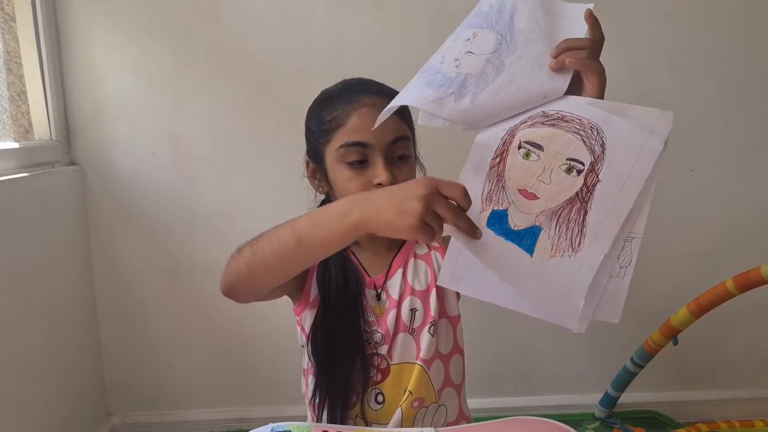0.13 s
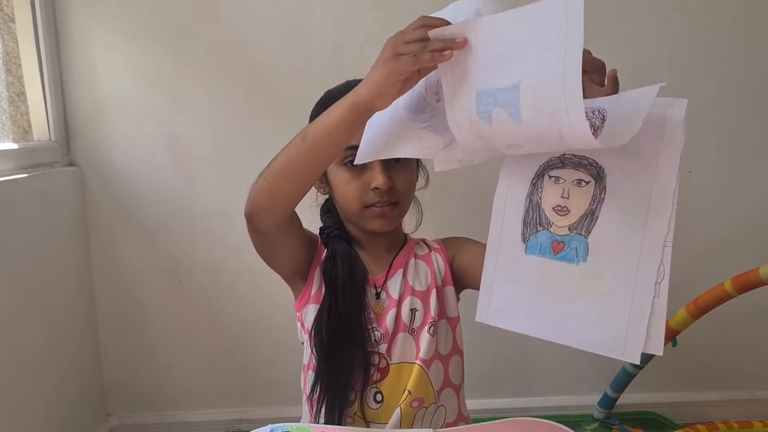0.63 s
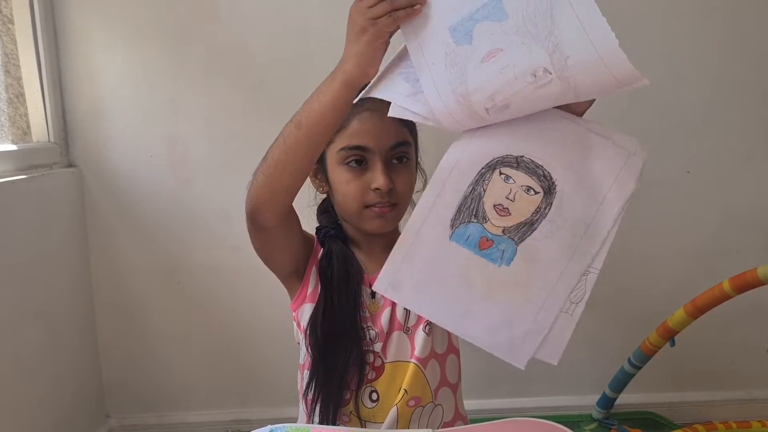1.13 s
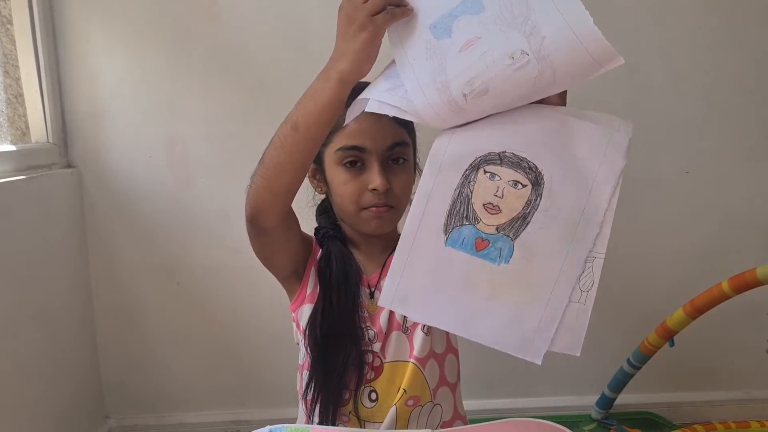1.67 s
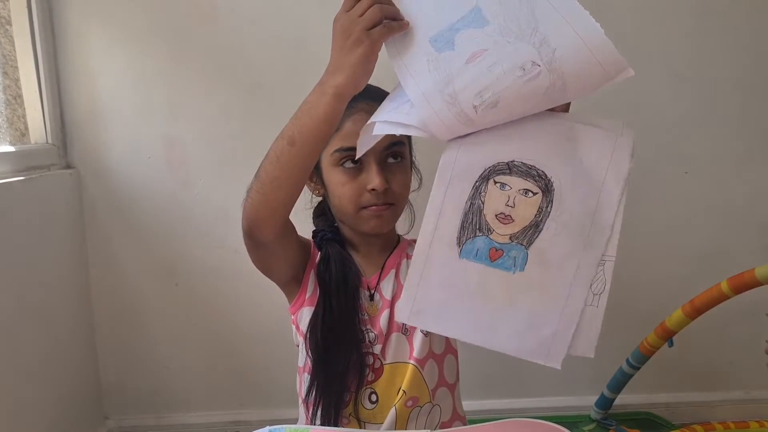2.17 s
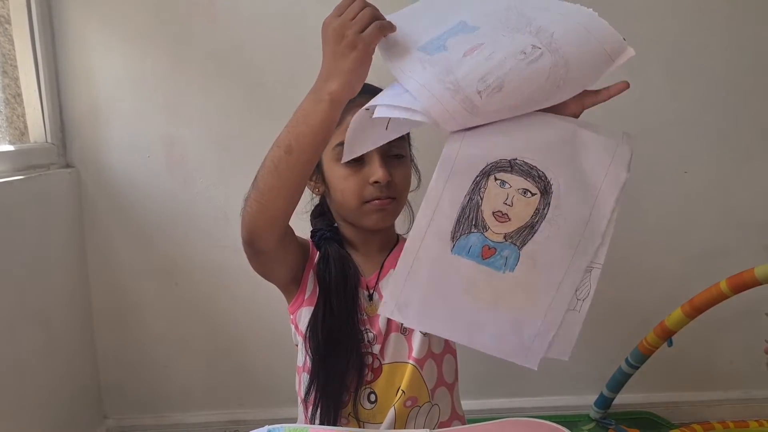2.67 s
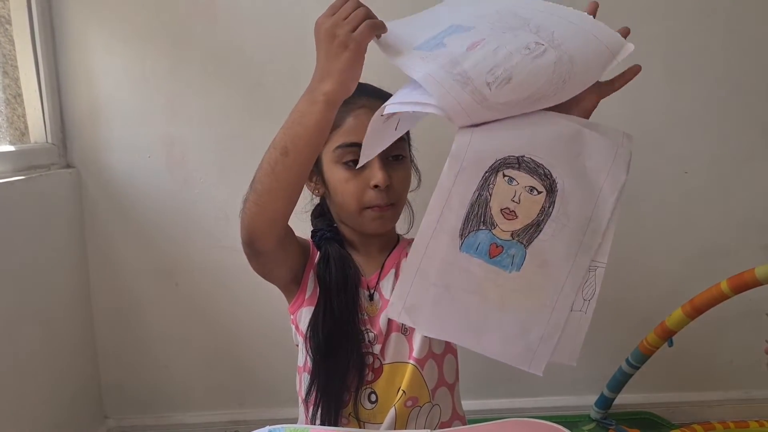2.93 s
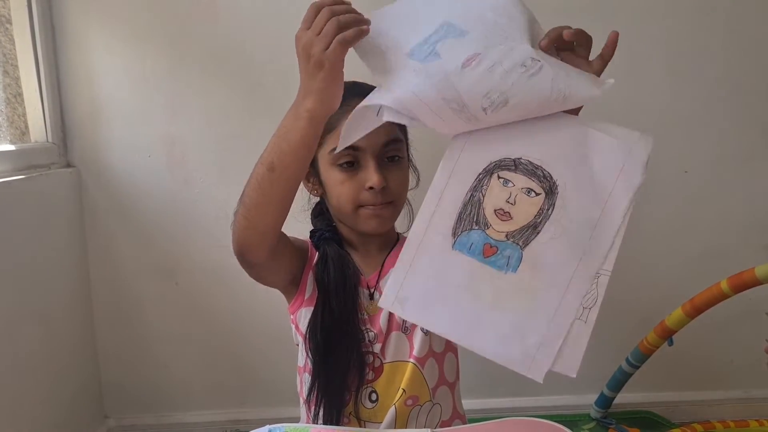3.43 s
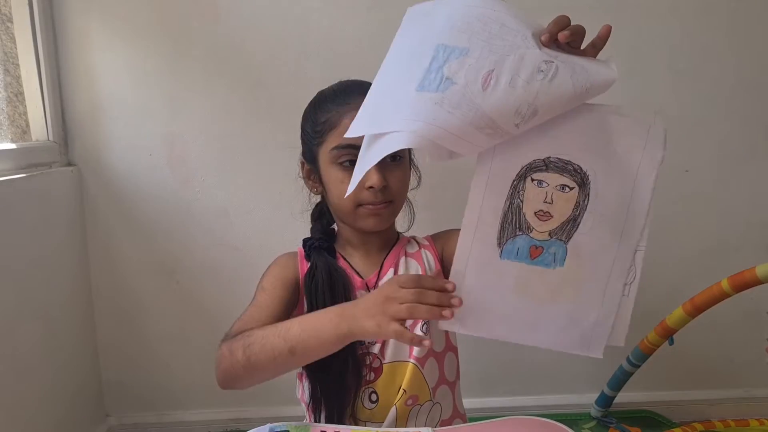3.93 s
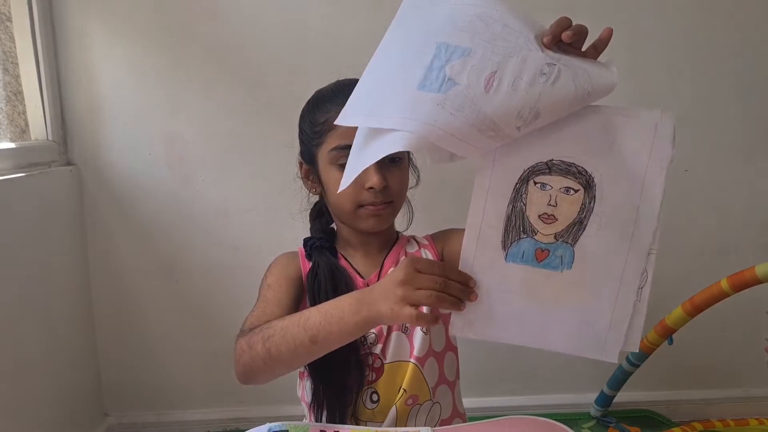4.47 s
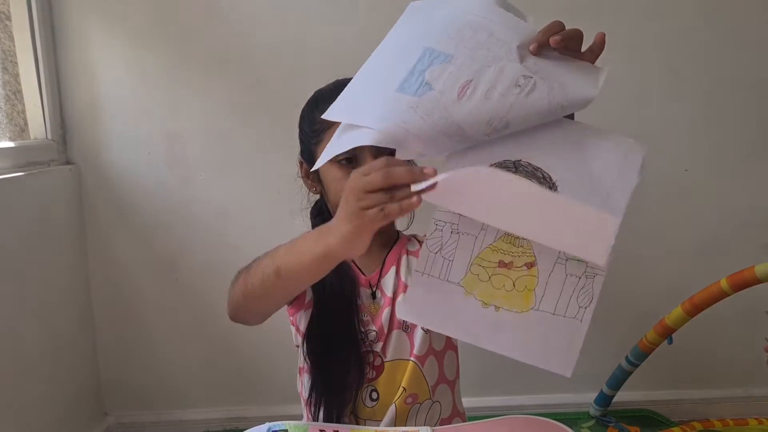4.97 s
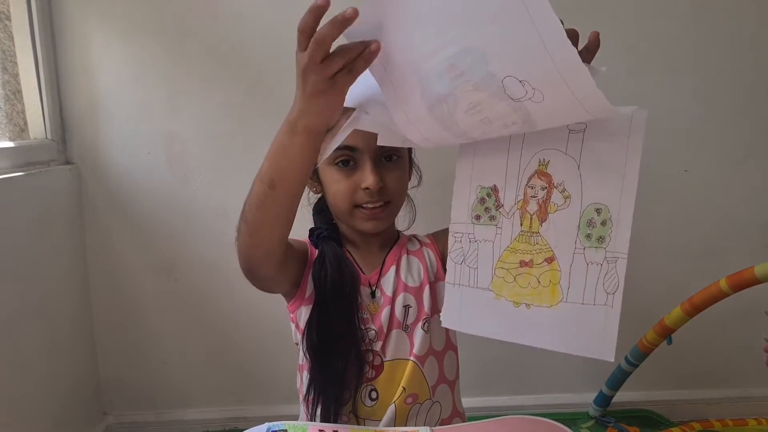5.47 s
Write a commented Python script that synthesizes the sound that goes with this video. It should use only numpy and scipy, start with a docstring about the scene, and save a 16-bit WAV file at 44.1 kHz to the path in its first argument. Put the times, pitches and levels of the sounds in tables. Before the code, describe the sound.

Loose sheets of paper are handled and turned close to the microphone in a small bare room. Faint air noise and a low, wavering hum continue throughout. From the start to about 0.45 seconds, rustling swells quickly into a cluster of crisp snaps and crackles, with low taut pops. A bright, clicky pop comes at 0.75 and a strong crack at 1.06. Then only faint sliding remains until a clear snap at 2.0 and a smaller one at 2.3. Rustling and buckling return from about 2.5 to 3.5, strongest near 3.0 and 3.28. It is almost still until 4.6, with tiny ticks. Another flip begins around 4.77, rustles strongly near 5.15, gives a sharp, high pop at 5.29 and ends with brisk crackles around 5.55. Snaps carry short, decaying room echoes; treble is much louder on the right.

```python
"""Room tone and a low wavering hum run from the first moment to the last: filtered noise, under everything.
Over them sheets of paper are lifted and flipped in a small bare room. They buckle with sharp snaps, each
a crack and a dying volley of creases, and the walls answer with decaying echoes. Between and under the
snaps the sheets slide over each other in swells of fine random crackle; from a quarter second on, some taut
patches pop with a pitch, as short dying sines. The right microphone port hears the treble far louder."""
import sys
import numpy as np
from scipy import signal
from scipy.fft import rfft, irfft, next_fast_len
from scipy.io import wavfile

SR = 44100
rng = np.random.default_rng(int(sys.argv[2]) if len(sys.argv) > 2 else 0)


def wav_out(sig):
    """Save sig, one row per channel (or a flat mono array), as 16-bit PCM at SR to the path in sys.argv[1]."""
    wavfile.write(sys.argv[1], SR, np.round(np.clip(np.atleast_2d(sig).T, -1, 1) * 32767).astype(np.int16))


def rack_gain(trim_db):
    """Turn a fader trim in dB into the linear factor to multiply a signal by."""
    fader = np.asarray(trim_db, float)
    return 10 ** (fader / 20)


N = 246959
HZ = np.fft.rfftfreq(next_fast_len(N + SR), 1 / SR) + 1e-3  # frequency grid, kept off zero for the log axis

# Colour of the room's air noise. Each row: frequency in Hz, relative density in dB per Hz.
ROOM_TONE_COLOUR = [(20, 3.5), (50, 10.5), (100, 10.5), (190, -3), (400, 5), (1300, -10), (2200, -92),
                    (3300, -11.5), (4000, -18.5), (6300, -14), (7800, -56), (10000, -43), (12000, -15),
                    (16000, -21)]
# Swelling and sinking of the hum. Each row: time in seconds, level ahead of the ports in dB.
HUM_SWELLS = [(0.0, -66), (0.25, -77), (0.36, -61), (0.92, -74), (1.12, -67), (2.21, -78), (2.28, -64.5),
              (3.1, -75), (3.38, -64.5), (3.51, -74), (3.9, -68), (4.18, -86), (4.44, -58.5), (4.6, -76),
              (4.66, -64), (5.6, -71)]
# The right port resonates. Each row: frequency in Hz, left minus right at full share in dB.
PORT_TILT = [(700, -0.5), (1400, -3.5), (2200, -8.5), (2700, -6.5), (3300, -16), (4000, -17), (6800, -25.5),
             (7600, -3), (8000, -17), (9200, -6), (12000, -33), (15000, -14)]
# How alike the two ports hear the sound. Each row: frequency in Hz, left-right likeness from 0 to 1.
PORT_LIKENESS = [(60, 0.95), (250, 0.81), (500, 0.85), (1000, 0.38), (2000, 0.06), (5000, 0.073)]
# Buckling snaps of the sheets. Each row: start in seconds, strength of the crackle in dB, then, in dB against
# that strength, sharpness of the crease, breadth of the panel, flap of the whole sheet.
SNAPS = [(0.0034, -36, -18, 2, -22), (0.1119, -30.5, -16, -11, -17), (0.1363, -28, -38, -9.5, -20.5),
         (0.2282, -33, -16, -22, -29), (0.2495, -23, -26, -10, -22), (0.2941, -26.5, -7.5, -3, -22),
         (0.303, -22.5, -9.5, -10, -21), (0.3199, -27, -38, -14, -28), (0.377, -28.5, -0.5, -9.5, -11.5),
         (0.3859, -26.5, -19, -12, -24), (0.5188, -41, -26, -10, -12), (0.6937, -38.5, -32, -13, -33),
         (0.7452, -25.5, -15.5, -13.5, -20.5), (0.819, -49, -22, -6, -3), (0.8546, -49.5, -30, 2.5, -12),
         (0.9665, -51, -36, -1, -21), (1.057, -18, -11.5, -5, -24), (1.2026, -44.5, -34, -2, -19),
         (1.7, -53.5, -3.5, 6, -27), (1.7519, -38, -19, -8, -32), (2.0121, -21.5, -21.5, -7.5, -26),
         (2.207, -67, -6, 12, -3), (2.2952, -36, -39, -9.5, -27), (2.5224, -36, -28, -1, -22.5),
         (2.5518, -40.5, -23.5, -17, -16.5), (2.9743, -32.5, -10.5, -8, -27),
         (3.0043, -32, -37, -8.5, -20.5), (3.1219, -39.5, -12, 3.5, -5), (3.257, -42, -7.5, 1, -32),
         (3.2843, -23, -9, -6.5, -24), (3.465, -34.5, -25, -9, -17), (3.9868, -51, -18.5, -31, -13),
         (4.4126, -49.5, -29, -12, -5), (4.607, -46.5, -27, -1.5, -10.5), (4.7664, -35, -19, -7, -7.5),
         (4.78, -30, -23.5, -10, -17), (4.8722, -47, -19, -5.5, -11), (5.0402, -43.5, -5, -18, -13.5),
         (5.2893, -25, -9, -17, -22), (5.375, -49, -26, -4, -6), (5.4189, -39.5, -30, -16, -11.5),
         (5.5082, -48, -14, -13, -17), (5.5513, -31.5, -22.5, -6.5, -45), (5.5924, -30, -22, -7, -24)]
# Colour of paper at the microphone. Each row: frequency in Hz, relative density in dB per Hz.
PAPER_COLOUR = [(80, -14.5), (200, -28), (500, -26.5), (1000, -6.5), (1600, 2.5), (2300, 1.5), (3300, 1),
                (5000, 1.5), (6700, -1.5), (7700, -11.5), (8800, -10), (12000, -3), (15500, -12),
                (16500, -53)]
# Borders in Hz between the flap, panel, crackle, crisp and edge ranges, from low to high.
RANGE_BORDERS_HZ = 900, 2600, 4600, 7500
# Decay of the echoes. Each row: frequency in Hz, time to fall by 60 dB in seconds.
ROOM_T60 = [(300, 0.19), (790, 0.098), (2090, 0.23), (5510, 0.33), (14600, 0.16)]
# Low standing waves that a flap excites. Each row: frequency in Hz, width in Hz, gain at the centre in dB.
ROOM_MODES = [(140, 25, 19), (260, 25, 8), (515, 45, 9)]
# Strokes of the hand that slide sheet over sheet. Each row: start in seconds, length in seconds,
# pressure as crackle level in dB, then, in dB against it, speed as sharpness, breadth in contact.
STROKES = [(0.014, 0.12, -56.5, -5.5, -4.5), (0.102, 0.074, -46, -16, -5), (0.199, .1, -43, -16.5, -3),
           (0.3, 0.061, -42.5, -29, -10), (0.403, 0.11, -54, -5, -7), (0.566, 0.094, -55, -5.5, -14.5),
           (0.637, 0.14, -52.5, 1, -8), (0.784, 0.17, -63, -2.5, 4.5), (0.837, 0.22, -59, -11.5, -9.5),
           (1.234, 0.14, -60.5, -8.5, -10), (1.356, .11, -61, -4.5, -8), (1.494, 0.25, -64, -7, -4),
           (1.69, .1, -60, -13, -12), (1.8, 0.39, -72, -6, -0.5), (2.172, 0.16, -64, -6, -18),
           (2.274, .14, -62, 3.5, -9), (2.391, 0.15, -58.5, -5, -21), (2.58, 0.18, -75, -3.5, -9),
           (2.693, 0.19, -66.5, -7, -12.5), (2.83, 0.51, -61.5, -3, -9), (2.98, 0.048, -45, -16, -5),
           (3.115, 0.1, -53.5, -2.5, 3.5), (3.213, 0.066, -49, -33, -14), (3.354, 0.17, -55.5, -11, -13),
           (3.477, 0.25, -69.5, -7.5, -3.5), (3.7, 0.034, -54, -10, -3), (4.287, 0.33, -79, -11, -4),
           (4.445, 0.13, -72, -3, -12), (4.497, 0.023, -59.5, -6, -14), (4.64, 0.029, -56.5, -7.5, -3.5),
           (4.664, 0.094, -57, -12.5, -1), (4.795, 0.14, -62.5, -6.5, -3.5),
           (4.949, 0.097, -61, -2.5, -6.5), (5.02, 0.26, -62, 2, -5.5), (5.127, .11, -45.5, -11, -3),
           (5.21, 0.22, -60.5, 4.5, 0), (5.38, 0.095, -56, -31, -1.5), (5.485, 0.16, -57.5, -9, -6)]
# Taut patches facing the microphone. Each row: start in seconds, strength ahead of the ports in dB,
# pitch in Hz, time to fall by 60 dB in seconds.
POPS = [(0.27, -40.5, 503, 0.093), (0.379, -41, 530, 0.073), (0.403, -44, 532, 0.074),
        (0.747, -21.5, 2880, .025), (0.75, -23, 4600, 0.016), (1.059, -32.5, 1052, .04),
        (1.202, -50, 1364, 0.13), (2.012, -49, 857, 0.044), (3.465, -33, 1490, 0.009),
        (3.987, -41.5, 4070, .015), (4.332, -57.5, 307, 0.11), (4.413, -50.5, 1600, 0.074),
        (4.7665, -45.5, 469, 0.12), (5.2904, -16, 3820, .01), (5.415, -46, 2050, .05),
        (5.551, -32, 2980, .01)]

ROOM_TONE_DB, HUM_HZ, HUM_WIDTH_HZ = -69.5, 67, 11
RIGHT_LAG_MS, TONE_PORT_SHARE = 0.095, 0.25  # the room tone takes only part of the port tilt
SPOTS = 4  # places where the sheets sound, each with its own echoes
CRACK_DB, CRUMPLE_S = 21.5, 0.0036  # first crack over the faintest creases; fading time of the volley
SETTLE_DB, SETTLE_S = -35, 0.083  # after a snap the sheet keeps creasing faintly
# Sharpness lifts the edge range in full and the crisp range in part; breadth lifts the panel range.
SNAP_FLAP_DB, SNAP_PANEL_DB, SNAP_EDGE_DB = 4, 2, 4
SNAP_CRISP_DB, SNAP_CRISP_SHARE = 6.5, 0.5
SLIDE_CRISP_DB, SLIDE_CRISP_SHARE = 4.5, 0.61
# The flap of a stroke follows pressure only in part, and breadth a little.
SLIDE_FLAP_DB, SLIDE_FLAP_SHARE, SLIDE_FLAP_FOLLOWS = -69.5, 0.19, 0.76
MEAN_PRESSURE_DB = -62
SWELL_POWER = 0.67  # a stroke swells and fades as a half sine to this power
GRIP_DB, GRIP_SHARP_DB, GRIP_BROAD_DB = -79, -9.5, -1  # the held sheets never rest quite still


def rms_one(x):
    """Scale to rms 1."""
    return x / np.sqrt(np.mean(x ** 2) + 1e-20)


def at_hz(points, hz=HZ):
    """Read a table of frequency and value on a log frequency axis."""
    table = np.array(points)
    return np.interp(np.log(hz), np.log(table[:, 0]), table[:, 1])


def shaped(x, gain):
    """Multiply the spectrum by a gain given on HZ."""
    size = 2 * len(HZ) - 2
    return irfft(rfft(x, size) * gain, size)[..., :N]


def drift(rate_hz):
    """Slow random wandering of rms 1: noise through two equal low-pass poles."""
    r = np.exp(-2 * np.pi * rate_hz / SR)
    slow = signal.lfilter([1], [1, -2 * r, r * r], rng.standard_normal(N + SR))
    return rms_one(slow[SR:])  # the first second is run-in


def pair(sources, port_share):
    """Two unrelated signals become left and right: alike in the bass, own gain per port, the right a little late."""
    alike = np.clip(at_hz(PORT_LIKENESS), 0, 1)
    mid, side = np.sqrt(1 + alike), np.sqrt(1 - alike)
    tilt = rack_gain(port_share * at_hz(PORT_TILT) / 2)
    norm = np.sqrt(tilt ** 2 + tilt ** -2)
    lag = np.exp(-2j * np.pi * HZ * RIGHT_LAG_MS / 1000)
    left, right = tilt / norm, lag / tilt / norm
    return np.array([shaped(sources[0], mid * left) + shaped(sources[1], side * left),
                     shaped(sources[0], mid * right) - shaped(sources[1], side * right)])


def room_tone():
    """Steady air noise, and a hum of narrow-band noise that wavers and follows its swells."""
    air = rms_one(shaped(rng.standard_normal((2, N)), rack_gain(at_hz(ROOM_TONE_COLOUR))))
    resonance = 1 / (1 + (2 * (HZ - HUM_HZ) / HUM_WIDTH_HZ) ** 2)
    hum = rms_one(shaped(rng.standard_normal((2, N)), resonance))
    hum_db = np.interp(np.arange(N) / SR, *np.transpose(HUM_SWELLS))
    return pair(rack_gain(ROOM_TONE_DB) * air + rack_gain(hum_db) * hum, TONE_PORT_SHARE)


def crackle(size, per_s, spread_db):
    """Tiny creases give way at random, a few much louder than the rest."""
    chance, rarity, side = rng.random((3, size))
    loudness = rack_gain(-spread_db * np.log(rarity + 0.012))
    return (chance < per_s / SR) * loudness * np.sign(side - 0.5)


def five_ranges(x):
    """Crackle, flap, panel, crisp and edge ranges, adjoining in frequency, each at rms 1."""
    a, b, c, d = RANGE_BORDERS_HZ
    cuts = [([b, c], "band"), ([a / 5, a], "band"), ([a, b], "band"), ([c, d], "band"), (d, "high")]
    filters = [signal.butter(2, hz, kind, fs=SR, output="sos") for hz, kind in cuts]
    return [rms_one(signal.sosfiltfilt(sos, x)) for sos in filters]


def snaps(paper, span_db=-18.5):
    """A panel pops through with one crack, then a dying volley of creases while the sheet settles."""
    span, lead = 4096, len(paper) // 2  # lead: delay of the centred paper filter
    out = np.zeros((SPOTS, N + SR))
    t = np.arange(span) / SR
    dying = np.exp(-t / CRUMPLE_S) + rack_gain(SETTLE_DB) * np.exp(-t / SETTLE_S)
    for k, (start_s, strength_db, sharp_db, broad_db, flap_db) in enumerate(SNAPS):
        volley = crackle(span, 12000, 4.4) * dying
        volley[0] = rack_gain(CRACK_DB)
        colour_db = np.array([0, SNAP_FLAP_DB + flap_db, SNAP_PANEL_DB + broad_db,
                              SNAP_CRISP_DB + SNAP_CRISP_SHARE * sharp_db, SNAP_EDGE_DB + sharp_db])
        ranges = five_ranges(np.convolve(volley, paper)[:span])
        at = round(start_s * SR)
        # span_db brings strength down to the mean level over the span
        out[k % SPOTS, at:at + span] += rack_gain(strength_db + span_db + colour_db) @ ranges
    return out[:, lead:lead + N]


def room(x, direct_db=-10.0, left_favour=0.08, early_db=7.0, early_s=0.00067,
         first_echo_s=0.00023, build_s=0.00055):
    """Direct sound, then echoes that thicken and die band by band: one part alike in both ports, one differing."""
    t = np.arange(SR // 2) / SR
    edges_hz = 75 * 2. ** np.arange(9)  # octaves
    white, tail = rng.standard_normal((2, 2, len(t))), 0
    for k, (low, high) in enumerate(zip(edges_hz, edges_hz[1:])):
        octave = signal.butter(2, [low, high], "band", fs=SR, output="sos")
        band = signal.sosfilt(octave, white[k % 2])
        t60 = at_hz(ROOM_T60, np.sqrt(low * high))
        tail = tail + band * rack_gain(-60 * t / t60) / np.sqrt(t60)
    tail = tail * (1 - np.exp(-np.maximum(t - first_echo_s, 0) / build_s))
    tail = tail * (1 + rack_gain(early_db) * np.exp(-t / early_s))  # near walls answer loudest
    tail /= np.sqrt(np.sum(tail ** 2) / 2)
    tail[:, 0] = rack_gain(direct_db) * np.array([1, left_favour])  # the left port faces the paper
    return signal.fftconvolve(x[None], tail, axes=1)[:, :N]


def standing_waves(x):
    """Low modes of the room ring along as narrow resonances."""
    return sum(rack_gain(db) * signal.lfilter(*signal.iirpeak(hz, hz / width, SR), x) for hz, width, db in ROOM_MODES)


def rub_gains(press_db, sharp_db, broad_db):
    """Pressure, speed and breadth of a rub set the gain of each of the five ranges."""
    flap_db = (SLIDE_FLAP_DB + SLIDE_FLAP_FOLLOWS * (press_db - MEAN_PRESSURE_DB)
               + SLIDE_FLAP_SHARE * broad_db)
    crisp_db = press_db + SLIDE_CRISP_DB + SLIDE_CRISP_SHARE * sharp_db
    return rack_gain([press_db, flap_db, press_db + broad_db, crisp_db, press_db + sharp_db])[:, None]


def sliding(paper, clump_db=3.0, wander_hz=6.0):
    """Dense creasing in clumps swells under each stroke; the place of contact wanders from spot to spot."""
    power = rub_gains(GRIP_DB, GRIP_SHARP_DB, GRIP_BROAD_DB) ** 2 * np.ones(N + SR)
    for start_s, length_s, *manner_db in STROKES:
        at = round(start_s * SR)
        swell = np.sin(np.pi * np.arange(0, 1, 1 / (length_s * SR))) ** SWELL_POWER
        power[:, at:at + len(swell)] += (rub_gains(*manner_db) * swell) ** 2
    grains = crackle(N, 3000, 4.47) * rack_gain(clump_db * drift(27))
    ranges = five_ranges(signal.fftconvolve(grains, paper, "same"))
    rustle = np.sum(np.sqrt(power[:, :N]) * ranges, axis=0)
    share = np.array([drift(wander_hz) for _ in range(SPOTS)]) ** 2
    return rustle * share / np.sqrt(np.sum(share ** 2, axis=0))


def pops():
    """Each taut patch pops as one tone that rises within a cycle and dies away, heard directly."""
    out, t = np.zeros(N + SR), np.arange(SR // 4) / SR
    for start_s, strength_db, hz, t60 in POPS:
        at = round(start_s * SR)
        envelope = np.minimum(hz * t, 1) * rack_gain(strength_db - 60 * t / t60)
        out[at:at + len(t)] += envelope * np.sin(2 * np.pi * hz * t)
    return np.array([out[:N], np.zeros(N)])  # only in the part alike in both ports


def scene():
    """Paper through the room to both ports, over the room tone."""
    paper_gain = rack_gain(at_hz(PAPER_COLOUR, np.fft.rfftfreq(512, 1 / SR) + 1))
    paper = np.fft.fftshift(irfft(paper_gain))  # centred filter
    heard = sum(room(spot) for spot in snaps(paper) + sliding(paper))
    return pair(heard + standing_waves(heard) + pops(), 1) + room_tone()


def band_limit(x):
    """A steep low-pass at the top of the band."""
    return signal.sosfilt(signal.butter(12, 16510, fs=SR, output="sos"), x)


def record(dry):
    """Hand over the finished mix."""
    return band_limit(dry)


dry = scene()
out = record(dry)
wav_out(out)
```